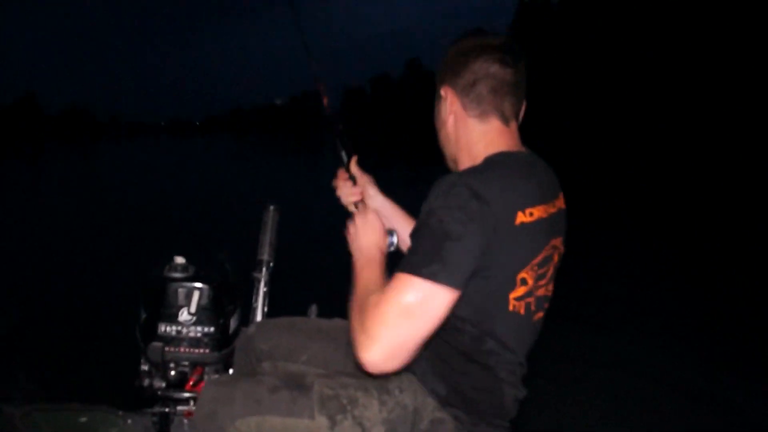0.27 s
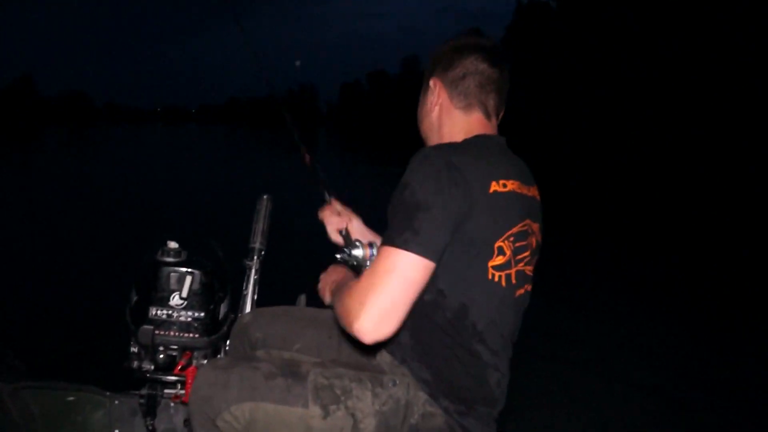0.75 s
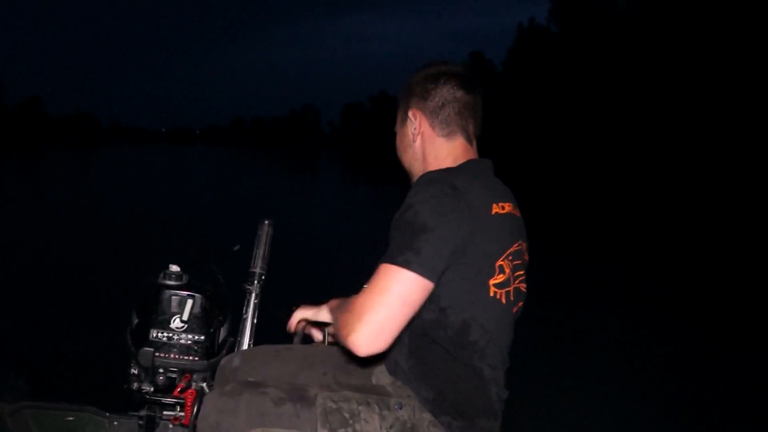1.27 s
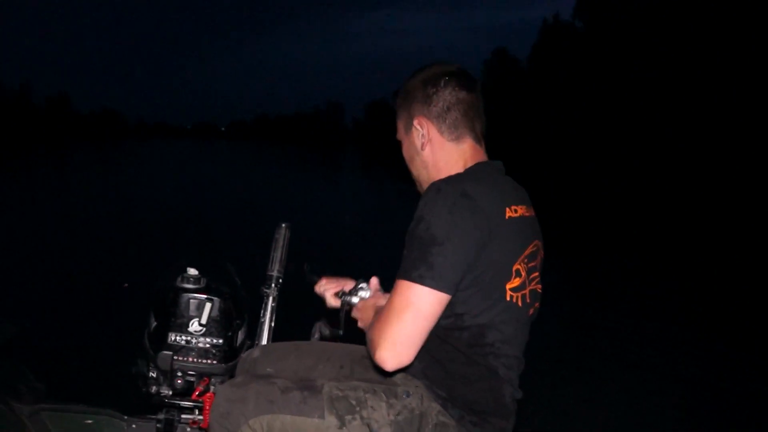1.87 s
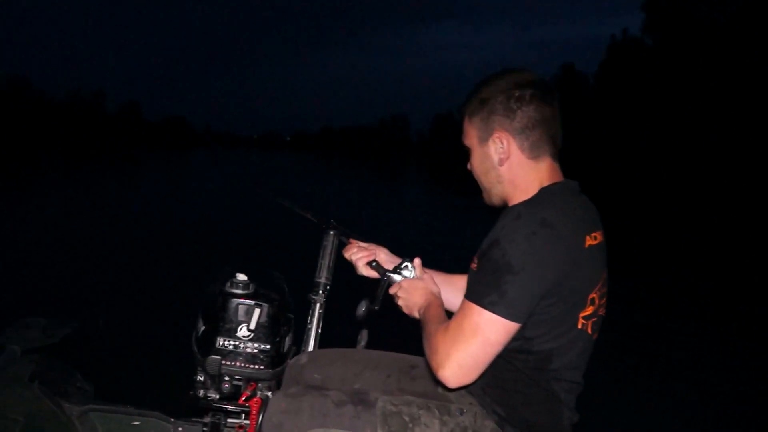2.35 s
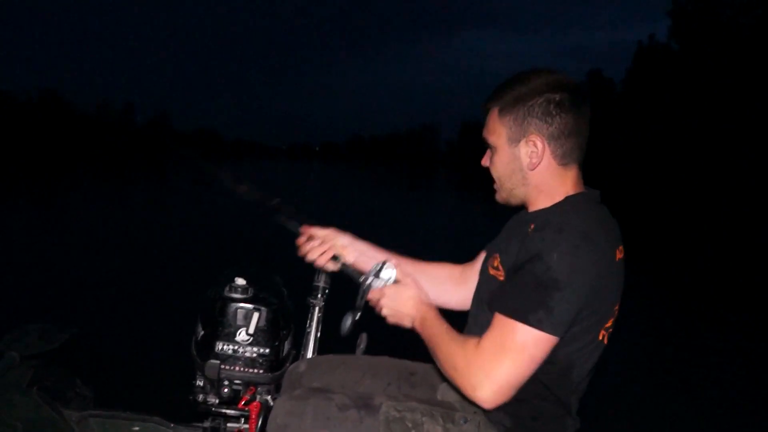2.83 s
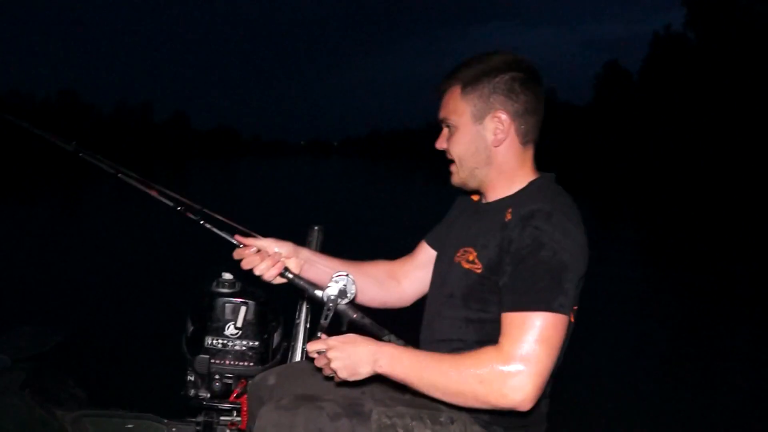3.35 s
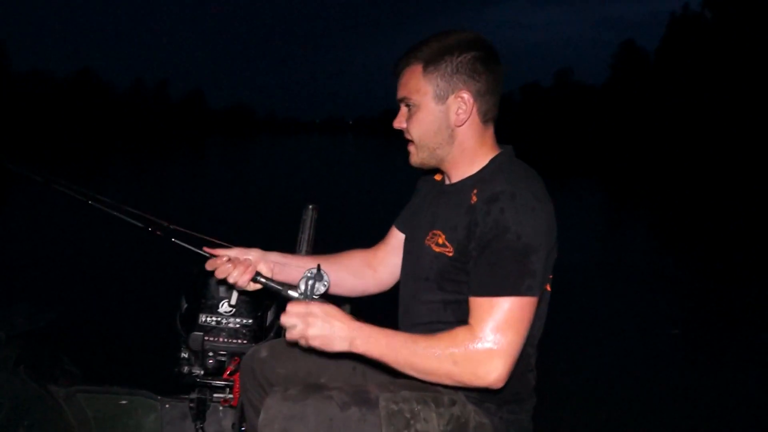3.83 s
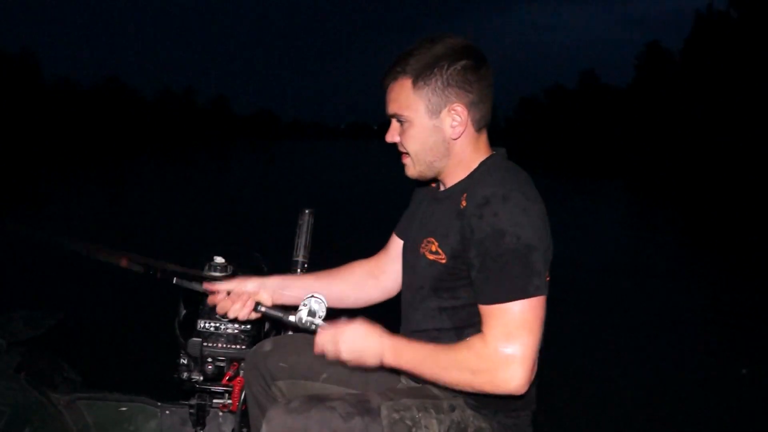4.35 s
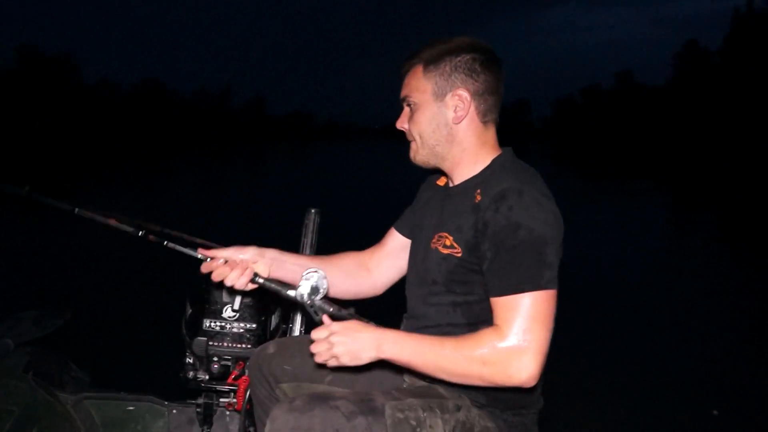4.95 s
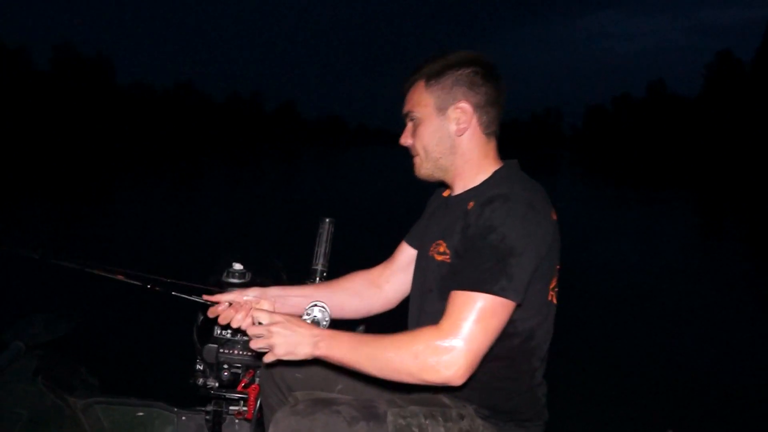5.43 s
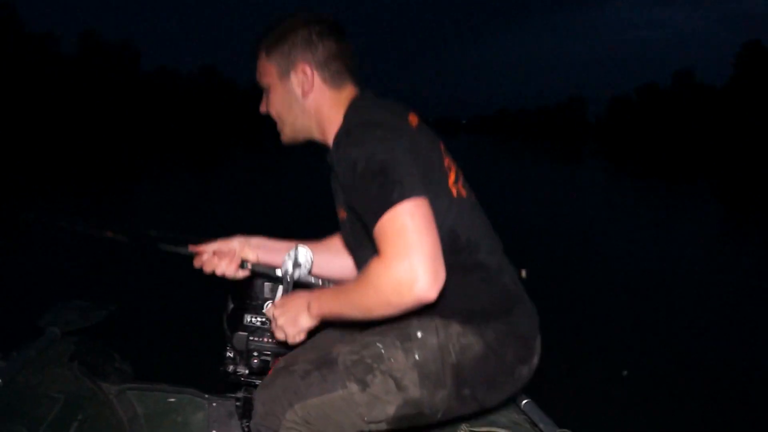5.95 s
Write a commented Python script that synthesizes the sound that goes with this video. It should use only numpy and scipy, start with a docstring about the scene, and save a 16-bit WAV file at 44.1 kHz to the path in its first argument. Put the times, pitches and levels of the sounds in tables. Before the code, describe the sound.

Close stereo outdoors at night on a boat. A reel ratchet buzzes sharply, pauses, then runs again with uneven speed. A quieter stretch follows with tackle clinks, cloth rubs, drips and one hard hull knock. The ratchet returns in two fast bursts, then loose separate clicks while water gulps beside the hull. Distant crickets and a soft steady night hiss lie underneath.

```python
"""A fishing reel clicks at night as line runs out in bursts, from single teeth up to a buzz.
Each tooth drops a spring-held pawl that sets the reel's metal parts ringing; a short echo of noise follows.
Tackle knocks and clinks as short noise bursts, water laps as shaped noise and gulps and drips as gliding tones.
Cloth brushes in swells of noise, far crickets sing as narrow noise, and a steady night noise lies under it all."""
import sys
import numpy as np
from scipy import signal
from scipy.fft import rfft, irfft, next_fast_len
from scipy.io import wavfile
from scipy.ndimage import uniform_filter1d, minimum_filter1d, map_coordinates

SR = 44100
rng = np.random.default_rng(int(sys.argv[2]) if len(sys.argv) > 2 else 0)


def store_wav(level_fs):
    """Save 16-bit WAV to argv[1]."""
    pcm = np.round(np.clip(np.atleast_2d(level_fs), -1, 1) * 32767)
    wavfile.write(sys.argv[1], SR, pcm.T.astype(np.int16))


N = 272979

# How strongly the water stirs round the hull and drops patter down.
# Each row: time in seconds, lapping level in dB, patter level in dB.
WATER_STIR = [(0, -56, -39), (.14, -43.5, -39), (.3, -50, -35), (.96, -41.5, -31.5), (1.25, -48, -34),
              (1.45, -50, -43.5), (1.96, -54, -46.5), (2.12, -58.5, -48), (2.9, -50.5, -48),
              (3.12, -42.5, -39), (3.29, -50, -42.5), (3.8, -55.5, -48), (4.55, -43.5, -39),
              (4.93, -55.5, -50), (5.4, -51.5, -42), (5.72, -41.5, -32), (5.95, -46.5, -41),
              (6.19, -51, -37)]


def amp(db):
    """Turns dB into gain."""
    return 10 ** (np.asarray(db) / 20)


def unit(x):
    """Scales a signal to an rms of 1."""
    return x / np.sqrt(np.mean(x ** 2) + 1e-20)


def along(points, hz):
    """Reads a curve of (Hz, value) points on a log frequency axis."""
    f, v = np.transpose(points)
    return np.interp(np.log(hz + 1), np.log(f + 1), v)


def curves(rows):
    """Gives one value per sample for each column after the time."""
    s, *columns = np.transpose(rows)
    return [np.interp(np.arange(N) / SR, s, c) for c in columns]


def wobble(rate):
    """Draws a smooth random curve through this many random points a second."""
    points = rng.standard_normal(int(N * rate / SR) + 4)
    return map_coordinates(points, [np.arange(N) * rate / SR])


def filtered(x, response):
    """Multiplies the spectrum of x by a response, given as a function of frequency in Hz."""
    m = next_fast_len(x.shape[-1] + 8192)  # room for the ringing to end
    spectrum = rfft(x, m) * response(np.fft.rfftfreq(m, 1 / SR))
    return irfft(spectrum, m)[..., :x.shape[-1]]


def modes(table):
    """Makes the response of resonances given as (Hz, width in Hz, dB), with alternating signs."""
    def response(f):
        total = 0
        for k, (center, width, db) in enumerate(table):
            damping = 1j * f * width
            total = total + (-1) ** k * amp(db) * damping / (center * center - f * f + damping)
        return total
    return response


def rush(spectrum, patchy_db):
    """Makes stereo noise of rms 1 whose loudness varies in random patches of time and pitch."""
    # How alike left and right are. Each row: frequency in Hz, likeness from 0 to 1.
    likeness = [(60, 1), (240, 0.39), (950, 0.02), (3770, 0.15), (15000, 1)]
    z = signal.stft(rng.standard_normal((2, N)), nperseg=512)[2]
    patches = uniform_filter1d(rng.standard_normal(z.shape[1:]), size=6, axis=0)
    patches = uniform_filter1d(patches, size=8, axis=1)
    pair = signal.istft(z * amp(patchy_db * unit(patches)), nperseg=512)[1][:, :N]

    def colour_and_spread(hz):
        turn = np.arccos(np.clip(along(likeness, hz), -1, 1)) / 2
        return amp(along(spectrum, hz)) * np.array([np.cos(turn), np.sin(turn)])

    mid, side = filtered(pair, colour_and_spread)
    return unit(np.array([mid + side, mid - side]))


def add(out, s, sound):
    """Mixes a sound into out at s seconds."""
    part = out[..., round(s * SR):round(s * SR) + sound.shape[-1]]
    part += sound[..., :part.shape[-1]]


def reel():
    """Turns the spool tooth by tooth, placing a pawl click and its short echo at each one."""
    # The spool's progress, one list for each run of line. Each row: time in seconds,
    # teeth passed since the row before, relative level of the spring's ring in dB.
    spool_turns = [
        [(.015, 1, -9.5), (.0285, 1, -6.5), (.0384, 1, -7), (.0678, 5, -5.5), (.1076, 5, -6.5), (.1691, 10, -5),
         (.2078, 7, -7), (.245, 8, -8.5), (.3008, 12, -5.5), (.338, 9, -16), (.3712, 8, -4.5), (.3913, 4, -8),
         (.4003, 1, -7)],
        [(.5603, 1, -13), (.5725, 1, -5), (.581, 1, -7), (.6105, 5, -12), (.6268, 2, -6), (.6584, 3, -11),
         (.6696, 2, -11), (.6786, 1, -7), (.694, 2, -15), (.7164, 4, -10), (.7591, 10, -11), (.8399, 14, -8.5),
         (.8728, 8, -13), (.9303, 12, -9.5), (.9764, 11, -5.5), (.9881, 2, -3.5), (.9974, 1, -10),
         (1.01, 1, -11), (1.025, 1, -9), (1.0352, 1, -10), (1.0548, 3, -9), (1.077, 4, -3.5), (1.0916, 2, -9),
         (1.1255, 3, -10), (1.1388, 1, -18), (1.161, 1, -11), (1.1796, 1, -12.5), (1.1939, 1, -7.5),
         (1.218, 2, -11)],
        [(4.2549, 1, -12), (4.2839, 1, -6.5), (4.31, 1, -9), (4.323, 1, -4.5), (4.3403, 2, -8),
         (4.3852, 9, -10), (4.3953, 1, -2.5), (4.41, 1, -1.5), (4.4212, 1, -7), (4.4353, 2, -4.5),
         (4.4622, 6, -8), (4.4995, 7, -7.5), (4.5437, 12, -10.5), (4.5548, 3, -4), (4.5777, 5, -2.5),
         (4.598, 3, -7), (4.64, 8, -4.5), (4.7095, 12, -4.5), (4.7346, 4, -3), (4.751, 2, -4),
         (4.7646, 1, -9.5)],
        [(5.125, 1, -9.5), (5.1394, 1, -4.5), (5.1594, 2, -5), (5.2245, 12, -7.5), (5.2555, 6, -2.5),
         (5.2934, 7, -10), (5.31, 3, -8), (5.3303, 3, -10.5), (5.353, 3, -4.5), (5.3733, 2, -3.5),
         (5.3862, 1, -11), (5.4017, 1, -5), (5.427, 1, -5)],
        [(5.5167, 1, -6), (5.5314, 1, -5), (5.5424, 1, -0.5), (5.555, 1, -4), (5.57, 1, -6), (5.6039, 1, -10.5),
         (5.6355, 1, -4.5), (5.6567, 1, -3), (5.6977, 1, -3.5), (5.7465, 1, -2.5), (5.7678, 1, -1.5),
         (5.7865, 1, -7), (5.8254, 2, -4.5), (5.8429, 1, -5), (5.8758, 2, -10.5), (5.8932, 1, -5.5),
         (5.912, 1, -6.5), (5.9394, 1, -8.5)],
    ]
    s, teeth, ring_db = np.transpose(np.concatenate(spool_turns))
    passed = np.cumsum(teeth)
    tooth = np.arange(passed[0], passed[-1] + 1)
    when = np.interp(tooth, passed, s)
    longest_gap = -minimum_filter1d(-np.gradient(when), size=7)  # among seven teeth
    fast = longest_gap < .007  # seconds
    when = np.where(fast, uniform_filter1d(when, size=5), when)  # the spool's inertia rounds changes of speed
    clicks = pawl_clicks(when, np.interp(tooth, passed, ring_db), fast)

    at = np.round(when * SR).astype(int)[:, None] + np.arange(clicks.shape[2])
    out, t = np.zeros((2, N)), np.arange(SR // 10) / SR
    for group in np.array_split(np.arange(len(tooth)), len(tooth) // 9):  # about nine teeth at a time
        start = at[group].min()
        places = (at[group] - start).ravel()
        direct = np.array([np.bincount(places, c[group].ravel()) for c in clicks])
        # a short echo of decaying noise, drawn afresh for each group
        tail = rng.standard_normal((2, len(t))) * amp(-60 * t / 0.043) * (t > .0015)
        echo = signal.fftconvolve(direct, tail / np.linalg.norm(tail[0]), axes=1)
        add(out, start / SR, direct)
        add(out, start / SR, amp(-8.5) * echo)
    return filtered(out, lambda hz: 1 / (1 + (500 / (hz + 1)) ** 4))  # a reel is too small to radiate bass


def pawl_clicks(when, ring_db, fast):
    """Drops the pawl with two rebounds per tooth, ringing spring, cup, frame and tip, plus a contact hiss."""
    # Ratchet spring. Each row: multiple of its pitch, width in Hz, relative level in dB.
    spring = [(.9, 348, 1.5), (1, 405, 11.5), (1.09, 443, 0), (1.2, 400, 1.5)]
    # Spool cup, reel frame and pawl tip. Each row: frequency in Hz, width in Hz, relative level in dB.
    cup = [(920, 154, -13.5), (1296, 280, -2.5), (1661, 144, -2.5), (1870, 217, 0)]
    frame = [(2453, 290, 4), (2782, 49, -23), (3240, 347, 7)]
    tip = [(5400, 350, -5), (5970, 252, -8), (6654, 188, -3.5), (7100, 220, -5), (7810, 410, 2),
           (8700, 670, 5.5), (11160, 410, 0), (10870, 440, 0), (11590, 436, 6.5), (12090, 450, 11.5),
           (13330, 510, 5), (14370, 460, 7), (16800, 470, -10)]
    # The click's changing colour, one list for each run of line. Each row: time in seconds,
    # spring pitch in Hz, then relative levels in dB of pawl tip, spool cup and frame.
    click_colour = [
        [(.015, 3940, -4, -20.5, -19.5), (.134, 4150, -3, -18.5, -14), (.23, 4060, -5, -17.5, -16),
         (.298, 3958, -7, -21.5, -23), (.34, 4014, -3, -20.5, -22.5), (.4, 4020, -8, -21, -21)],
        [(.56, 3990, -7, -17, -16.5), (.63, 4310, -6, -14, -19.5), (.675, 4000, -9.5, -18, -16),
         (.72, 4040, -6.5, -13, -22.5), (.84, 4010, -6, -15, -19), (.91, 3860, -9, -13.5, -20.5),
         (.99, 4160, -8, -17, -20), (1.088, 3980, -9, -19, -22), (1.12, 4050, -11.5, -19, -25),
         (1.23, 3996, -10, -21.5, -25)],
        [(4.25, 3820, -6.5, -17.5, -26), (4.338, 4200, -5, -17.5, -25), (4.412, 4040, -4.5, -20, -26),
         (4.46, 3990, -5.5, -10, -25), (4.55, 3973, -6, -14.5, -23), (4.6, 4110, -6.5, -19.5, -17),
         (4.698, 4110, -6, -17, -23.5), (4.77, 4030, -7.5, -16.5, -17)],
        [(5.12, 4246, -5, -16.5, -14), (5.22, 3980, -3.5, -14, -19.5), (5.282, 3930, -4.5, -13.5, -16),
         (5.31, 4150, -6, -14.5, -17), (5.356, 4370, -6.5, -21, -18), (5.43, 3960, -7, -21.5, -30)],
        [(5.51, 4160, -6.5, -19, -18.5), (5.62, 4180, -5.5, -20, -16), (5.75, 4100, -7, -17, -26),
         (5.822, 4250, -4, -18, -16), (5.87, 4060, -5, -15.5, -15), (5.95, 4180, -6, -18, -19.5)],
    ]
    at_s, *colour = np.transpose(np.concatenate(click_colour))
    pitch, tip_db, cup_db, frame_db = [np.interp(when, at_s, c) for c in colour]

    count, t = len(when), np.arange(SR // 50) / SR
    clicks = np.zeros((2, count, len(t)))
    # resonances, frequency multiplier, level per tooth in dB, rise in s, phase scatter in radians
    parts = [(spring, pitch[:, None], ring_db - 1, .0006, .3), (cup, 1, cup_db + 3, .0012, .4),
             (frame, 1, frame_db + 5, .001, .4), (tip, 1, tip_db - 4, .0007, 1.5)]
    for table, scale, part_db, rise, scatter in parts:
        for k, (hz, width, db) in enumerate(table):
            luck = rng.standard_normal((count, 5))
            drift = 3 * uniform_filter1d(luck[:, 0], size=9)  # wanders slowly from tooth to tooth
            level = amp(part_db + db + 1.8 * luck[:, 1] + 2.2 * drift)
            drift = drift[:, None]
            lean = 0.061 * (1 + drift * 0.47) * (-1) ** k  # left-right phase offset, radians
            first_rebound = 0.36 * (1 + 0.3 * fast)  # stronger when the spool races
            # delay in s, size, phase in radians
            drops = [(0, 0.88, scatter * luck[:, 2]), (.0026, first_rebound, 2 * luck[:, 3]),
                     (.0054, 0.038, 2 * luck[:, 4])]
            for delay, size, phase in drops:
                u = np.maximum(t - delay, 0)
                swell = (1 - np.exp(-u / rise)) ** 2
                ring = (size * level)[:, None] * swell * np.exp(-np.pi * width * u)
                angle = 2 * np.pi * (hz * scale + 60 * drift) * u + phase[:, None] + np.pi * k
                clicks += ring * np.sin([angle + lean, angle - lean])

    hiss = rng.standard_normal((3, count, len(t)))  # the bare steel contact, different at every tooth
    burst = amp(tip_db - 5.5)[:, None] * (1 - np.exp(-t / 0.00053)) * amp(-60 * t / 0.012)
    bright_hiss = np.diff(hiss[0] + 1.6 * hiss[1:], axis=2, prepend=0)  # shared and separate parts
    return clicks + bright_hiss * burst / 2


def knocks():
    """Makes each impact from contact noise round its centre pitch plus a low thud of the hull."""
    # Dull hull knocks, clinks of tackle held clear of the hull, and bright wet slaps. Each row: time in seconds,
    # level in dB before the shared 18 dB lift, centre in Hz, 60 dB decay time in seconds.
    dull_knocks = [(.149, -13, 990, 0.071), (1.24, -23.5, 800, 0.032), (1.469, -33, 2920, 0.024),
                   (1.69, -30.5, 1000, 0.046), (1.908, -27.5, 1390, 0.024), (1.978, -42, 1200, .022),
                   (2.598, -32.5, 500, 0.023), (2.839, -25.5, 1270, 0.035), (3.016, -12.5, 1410, 0.013),
                   (3.029, -2.5, 1190, 0.021), (3.06, -30, 1400, 0.051), (3.072, -18.5, 980, 0.045),
                   (3.121, -22.5, 880, 0.032), (3.931, -35.5, 2780, .021)]
    tackle_clinks = [(.45, -22, 2450, 0.31), (.665, -3.5, 1330, 0.02), (.666, -14, 640, 0.021),
                     (1.354, -33, 3950, 0.019), (1.368, -21.5, 1830, 0.042), (1.501, -33, 1700, 0.029),
                     (1.519, -28, 2400, 0.019), (1.555, -36, 854, .03), (1.61, -23.5, 880, 0.055),
                     (1.645, -34, 1480, .03), (1.843, -34, 4140, .049), (1.884, -34, 3000, 0.027),
                     (2.547, -36, 4160, .021), (3.276, -31.5, 5500, .015), (3.345, -25, 1610, 0.11),
                     (3.54, -25, 840, 0.12), (4.143, -36.5, 4400, .022), (4.162, -22.5, 4230, 0.021),
                     (4.18, -29, 4230, 0.025)]
    wet_slaps = [(2.999, -24.5, 1010, 0.097), (3.072, -17, 6400, .0069), (3.251, -28, 1050, 0.021),
                 (3.266, -29, 1100, 0.036), (3.432, -34, 4400, 0.02), (3.527, -40, 9000, .012)]
    # The hull's resonances. Each row: frequency in Hz, width in Hz, relative level in dB.
    hull = [(166, 50, -3), (294, 134, -5), (414, 135, -2.5), (660, 160, -4), (984, 450, -5)]
    # rows, width as a share of the centre at a 0.036 s decay, thud and treble relative levels in dB
    kinds = [(dull_knocks, 2.25, -9, -43.5), (tackle_clinks, 0.48, -40.5, -25.5), (wet_slaps, 5.1, -5, 1.5)]
    out, t = np.zeros((2, N)), np.arange(SR // 8) / SR
    for rows, share, thud_db, treble_db in kinds:
        for s, db, hz, t60 in rows:
            envelope = (1 - np.exp(-t / 0.000093)) * amp(-60 * t / t60)
            mid, side, low = rng.standard_normal((3, len(t))) * envelope
            pair = np.array([mid + 0.73 * side, mid - 0.54 * side])
            width = share * hz * (0.036 / t60) ** 0.13  # short knocks are broader in pitch
            body = modes([(hz, width, 0)])
            tick = filtered(pair, lambda f: body(f) ** 2)
            tick += filtered(pair * amp(-60 * t / 0.004), modes([(8000, 41000, treble_db)]))  # treble dies first
            thud = filtered(low, modes(hull))
            tick, thud = tick / np.linalg.norm(tick), thud / np.linalg.norm(thud)
            add(out, s, amp(db + 18) * (tick + amp(thud_db) * thud))
    return out


def water():
    """Mixes unevenly swelling lapping noise with gulps, drips and a few ticks made as short gliding tones."""
    # The lapping's spectrum. Each row: frequency in Hz, relative level in dB.
    lap_spectrum = [(15, -68), (25, -50), (52, -30), (162, -8.5), (202, -9), (312, -7.5), (700, -16.5),
                    (910, -15), (1540, -120)]
    # Air pockets by the hull. Each row: time in seconds, level in dB, pitch in Hz.
    air_gulps = [(1.289, -38, 381), (1.698, -31, 206), (1.73, -31, 198), (1.765, -42, 230),
                 (1.935, -20.5, 203), (2.592, -36, 283), (2.729, -35.5, 201), (2.982, -32, 180),
                 (3.037, -24, 362), (3.076, -8, 169), (3.19, -28, 199), (4.222, -25.5, 296.2),
                 (4.968, -39, 147.3), (5.477, -42, 142), (5.557, -12, 251), (5.572, -23.5, 913),
                 (5.573, -17, 350), (5.587, -9, 212), (5.59, -30, 825), (5.645, -20.5, 252),
                 (5.665, -30, 924), (5.68, -23, 297), (5.715, -29.5, 366), (5.797, -12, 241.6),
                 (5.8, -27, 610), (5.821, -18, 145), (5.849, -26, 225), (5.919, -27, 215)]
    # Short gliding tones: drips, a compact tick at 2.288 s and a low clink at 4.87 s.
    # Each row: time in seconds, level in dB, starting pitch in Hz, 60 dB decay time in seconds,
    # rise (half the share the pitch climbs by).
    gliding_tones = [(1.39, -36.5, 780, 0.137, .39), (2.288, -32.5, 2250, 0.029, .03),
                     (2.352, -42.5, 890, .24, .3), (1.61, -32.5, 760, .08, .15),
                     (4.872, -16, 295, 0.026, .03), (4.871, -21.5, 726, 0.019, .03)]
    out = amp(curves(WATER_STIR)[0] + 2.2 * wobble(14)) * rush(lap_spectrum, patchy_db=3)
    for s, db, hz in air_gulps:
        t60 = 0.037 * amp(0.48 * (-11 - db))  # seconds; a violent gulp bursts sooner
        add(out, s, bubble(db, hz, t60, 0.041))
    for s, *shape in gliding_tones:
        add(out, s, bubble(*shape))
    for when, pitch, size in rng.random((70, 3)):  # small chance drips
        hz = 300 * amp(19 * pitch)
        level_db = -52 - 5 * np.log(size + 0.00084)  # most are faint, a few loud
        add(out, when * N / SR, bubble(level_db, hz, 30 / hz, 0.54))
    return out


def bubble(db, hz, t60, rise):
    """Rings unsteadily and climbs in pitch, as a pocket of air does when it nears the surface."""
    t = np.arange(round(t60 * SR)) / SR
    waver = 0.85 * np.sin(2 * np.pi * (28 * t + rng.random()))
    tone = np.sin(2 * np.pi * hz * (t + rise * t * t / t60) + waver)
    balance = amp(np.array([[1], [-1]]) * rng.normal(0, 0.27))  # slightly left or right
    return amp(db - 60 * t / t60) * (1 - np.exp(-t * hz)) * tone * balance


def cloth():
    """Brushes sleeves in grainy swells of noise as the angler shifts, over a duller patter of drops."""
    # The rubbing noise's spectrum. Each row: frequency in Hz, relative level in dB.
    cloth_spectrum = [(200, -26), (400, -5), (850, -4), (1650, -5.5), (2450, -3.5), (4900, -4),
                      (9000, -12.5), (16000, -13), (20000, -40)]
    # Sleeve strokes. Each row: start in seconds, length in seconds, level in dB,
    # corner in Hz above which the stroke gets duller.
    sleeve_strokes = [(1.286, 0.15, -36, 5000), (1.823, 0.066, -39.5, 7000), (2.52, 0.087, -57, 12000),
                      (2.946, 0.16, -32.5, 4000), (3.232, 0.066, -44, 9000), (3.299, 0.13, -39.5, 30000),
                      (3.468, 0.19, -40, 30000), (3.86, 0.25, -33, 1960), (0.387, 0.12, -32.5, 3050),
                      (4.124, 0.079, -52, 6000)]
    noise = amp(2.3 * wobble(330)) * rush(cloth_spectrum, patchy_db=1.5)
    # played backwards with sides swapped, so that the patter differs from the strokes
    patter = filtered(noise[::-1, ::-1], lambda hz: 1 / (1 + (hz / 2500) ** 4))
    out = amp(curves(WATER_STIR)[1]) * patter
    for s, length, db, corner_hz in sleeve_strokes:
        stroke = noise[:, round(s * SR):round((s + length) * SR)]
        dulled = filtered(stroke, lambda hz: 1 / (1 + (hz / corner_hz) ** 2))
        add(out, s, amp(db) * np.hanning(stroke.shape[1]) * dulled)
    return out


def crickets():
    """Makes a far chorus from narrow noise that throbs unevenly and drops back now and then."""
    # Brief changes of the chorus, mostly lulls. Each row: middle in seconds, level change in dB.
    chorus_lulls = [(0, 0), (1.6, 2), (1.75, -6), (2.17, -4.5), (2.52, -6), (2.9, -10), (3.1, -7),
                    (3.3, -5), (3.75, -4), (4.8, -7)]
    song = modes([(4420, 220, 0), (4200, 300, -8)])
    band = filtered(rng.standard_normal((2, N)), lambda hz: song(hz) ** 2)
    t = np.arange(N) / SR
    lull_db = sum(db * np.exp(-((t - s) / 0.097) ** 2) for s, db in chorus_lulls)
    chorus = unit(band + 0.35 * band[::-1])  # each side leaks into the other
    return amp(-53.5 + lull_db + 1.8 * wobble(35)) * chorus


def night_air():
    """Makes the steady background from shaped, nearly even noise."""
    # The background's spectrum. Each row: frequency in Hz, relative level in dB.
    night_spectrum = [(15, -54), (25, -14), (123, -2), (624, -13.5), (734, -6.5), (796, -9.5), (887, -5.5),
                      (2760, -11.5), (4370, -10), (4870, -13.5), (16000, -21.5)]
    return amp(-48) * rush(night_spectrum, patchy_db=.3)


def scene():
    """Adds up everything the two microphones hear."""
    return reel() + knocks() + water() + cloth() + crickets() + night_air()


def record(dry):
    """Rounds peaks off at full scale, then fades out the treble between 15600 and 15900 Hz."""
    soft = dry / (1 + np.abs(dry) ** 20) ** (1 / 20)
    return filtered(soft, lambda hz: np.clip((15900 - hz) / 300, 0, 1))


dry = scene()
out = record(dry)
store_wav(out)
```